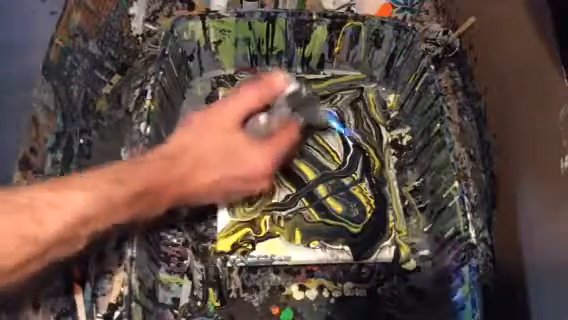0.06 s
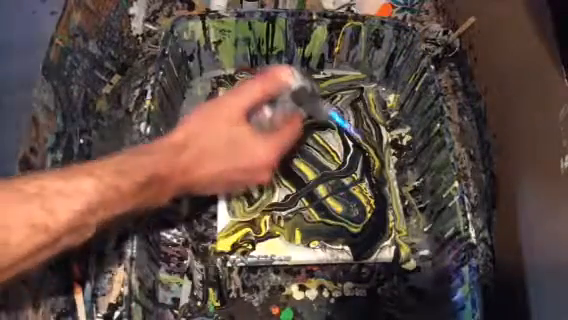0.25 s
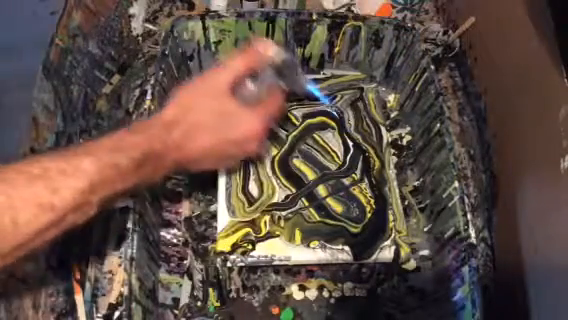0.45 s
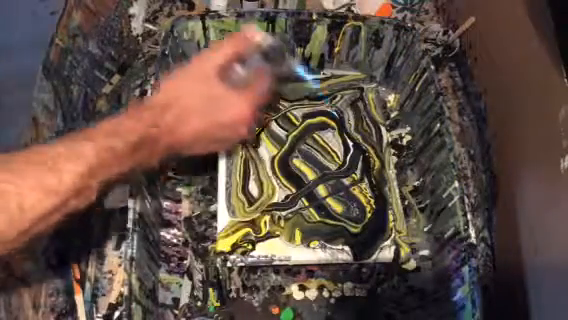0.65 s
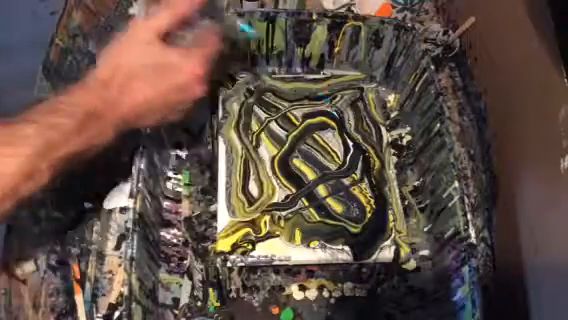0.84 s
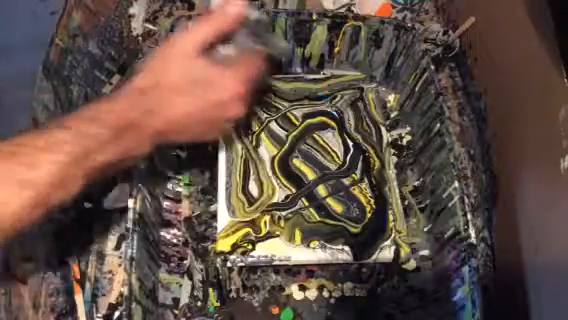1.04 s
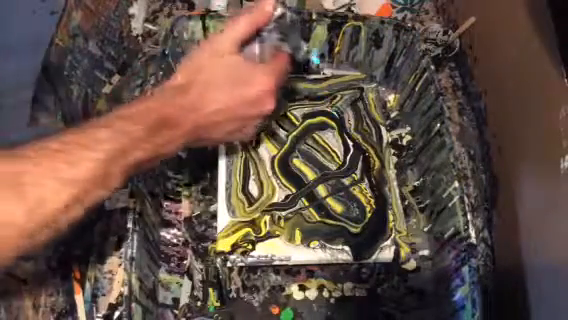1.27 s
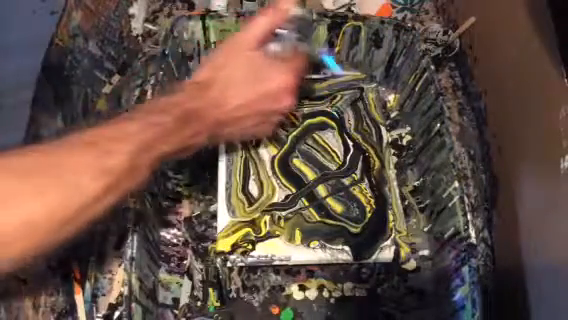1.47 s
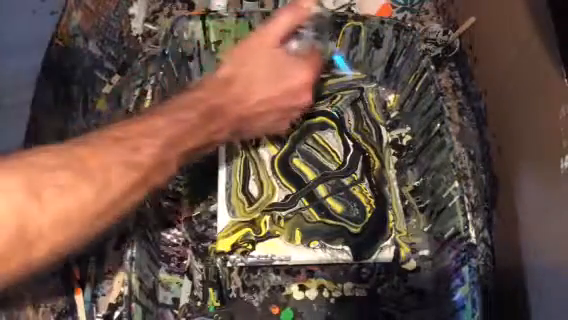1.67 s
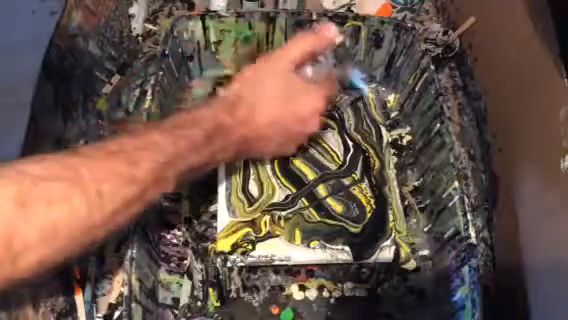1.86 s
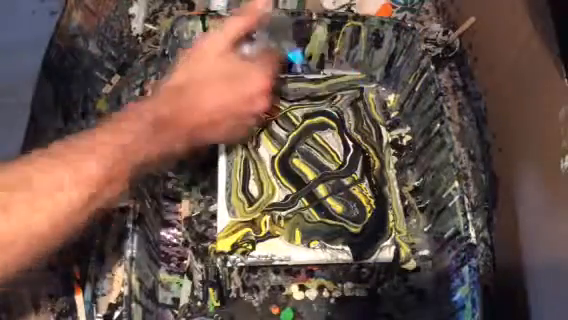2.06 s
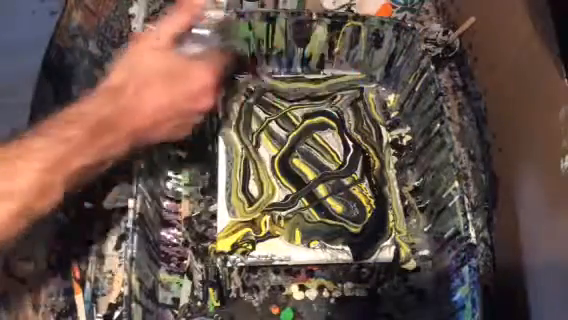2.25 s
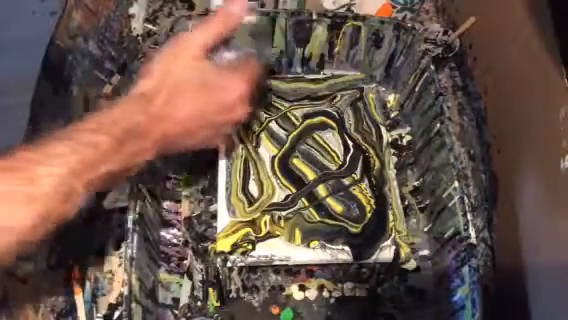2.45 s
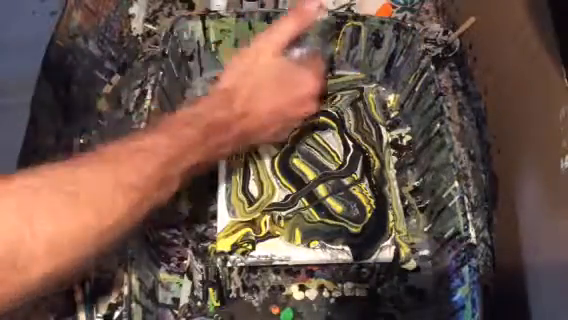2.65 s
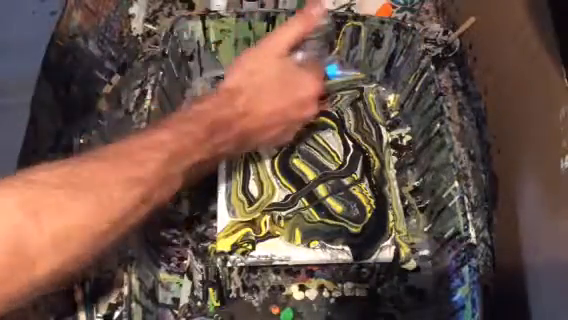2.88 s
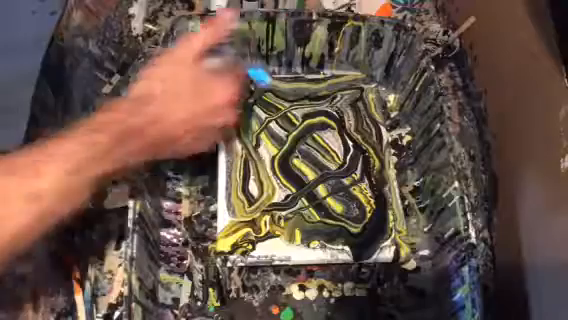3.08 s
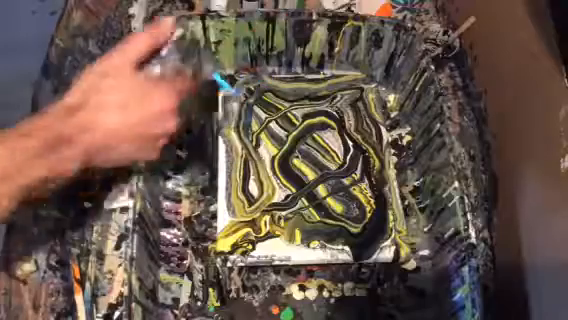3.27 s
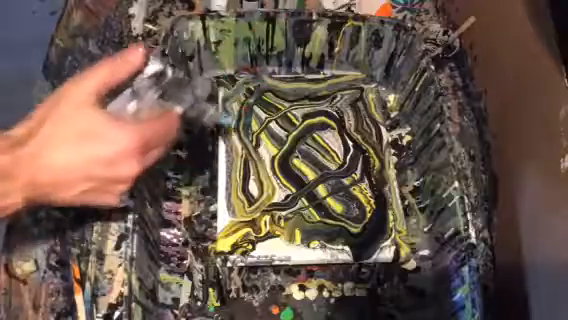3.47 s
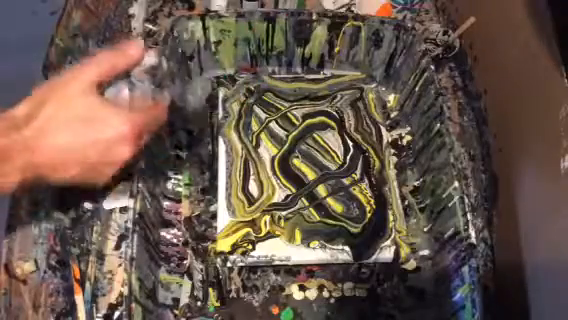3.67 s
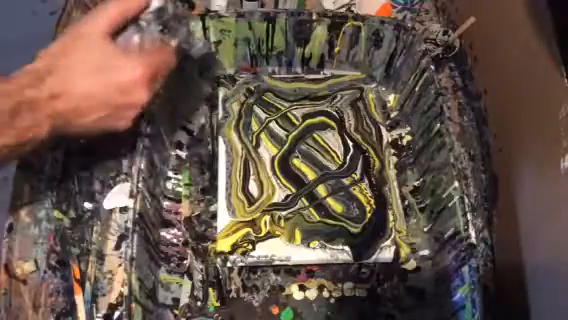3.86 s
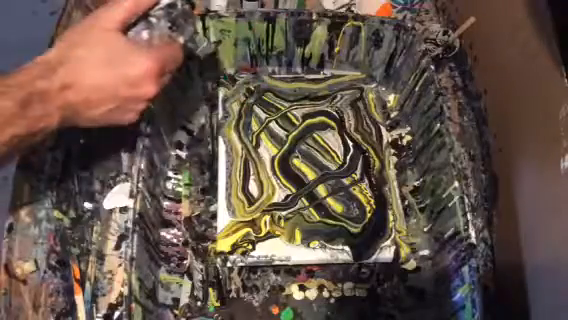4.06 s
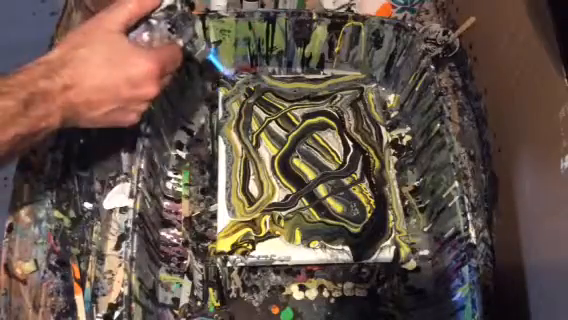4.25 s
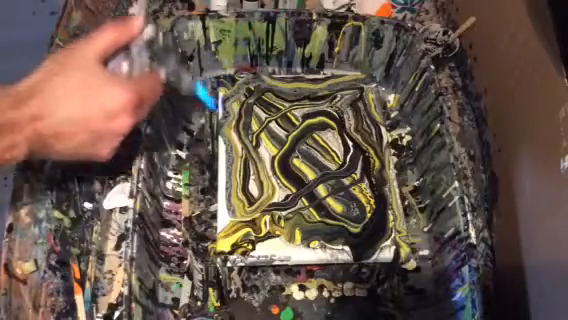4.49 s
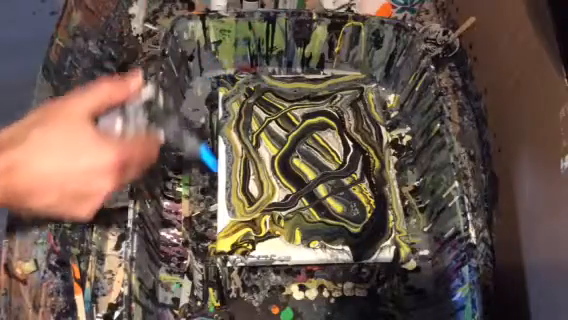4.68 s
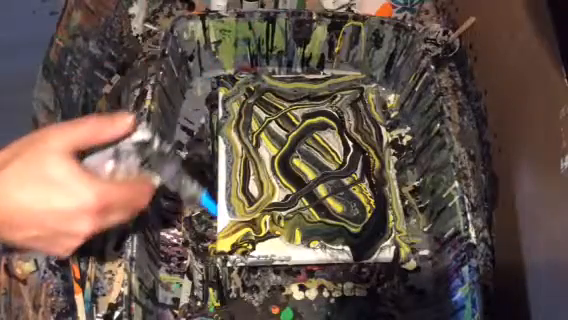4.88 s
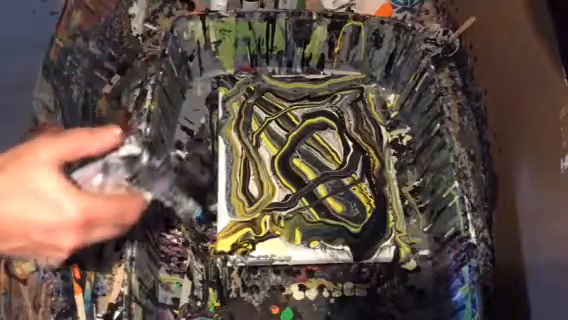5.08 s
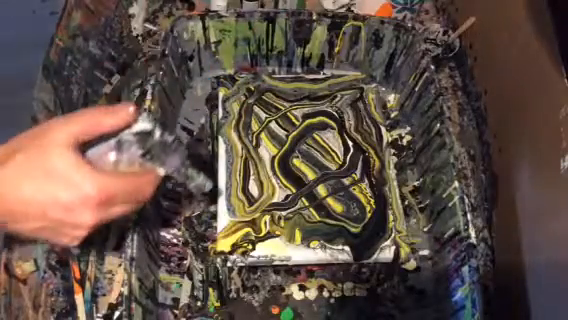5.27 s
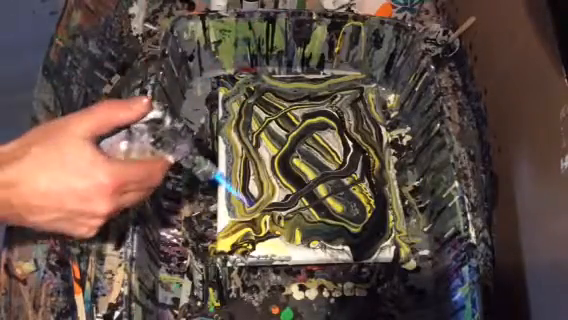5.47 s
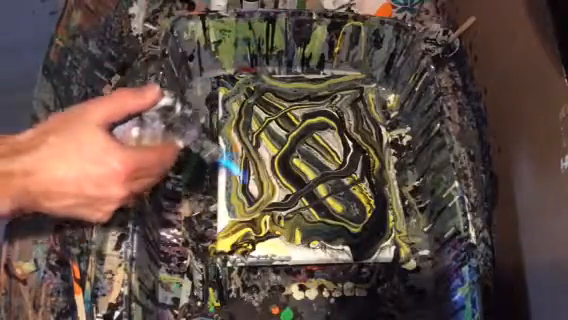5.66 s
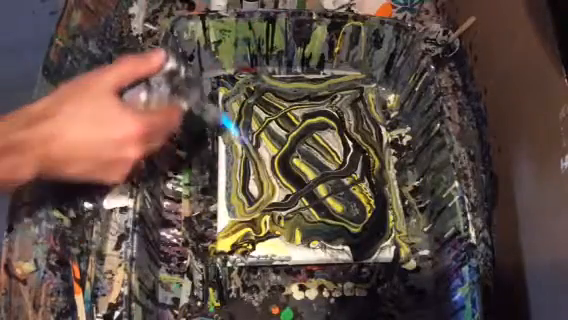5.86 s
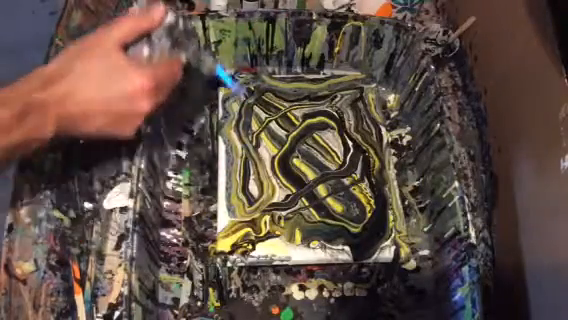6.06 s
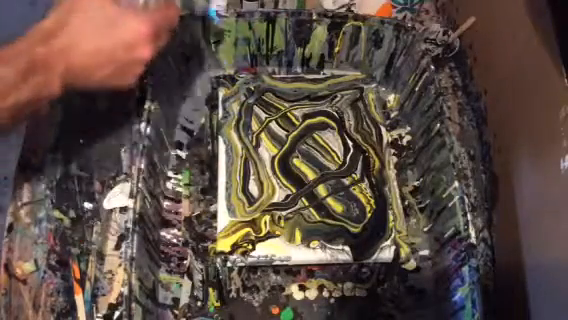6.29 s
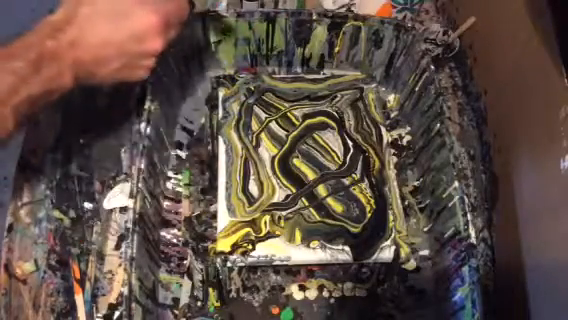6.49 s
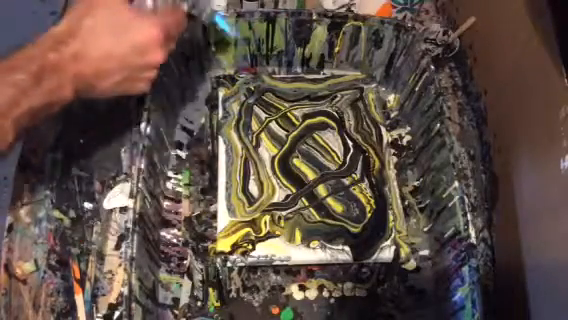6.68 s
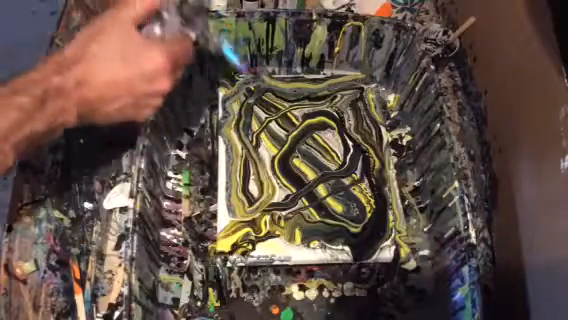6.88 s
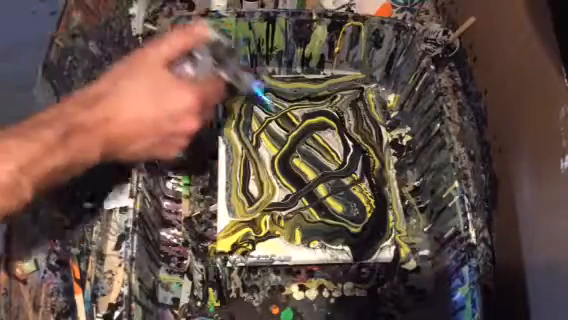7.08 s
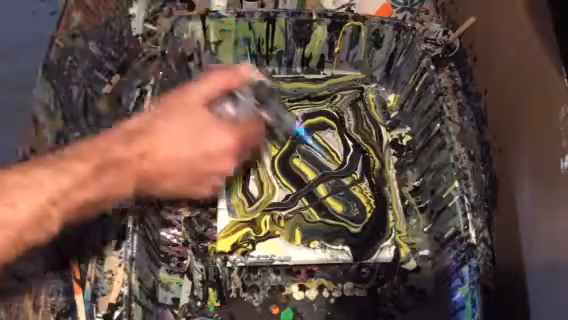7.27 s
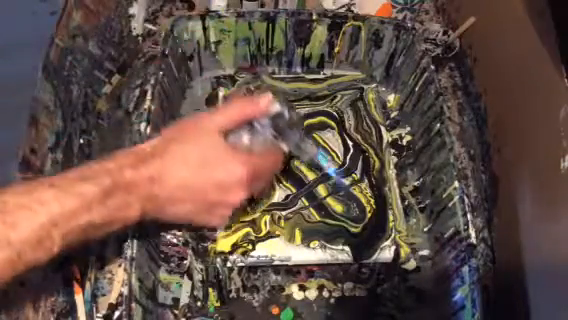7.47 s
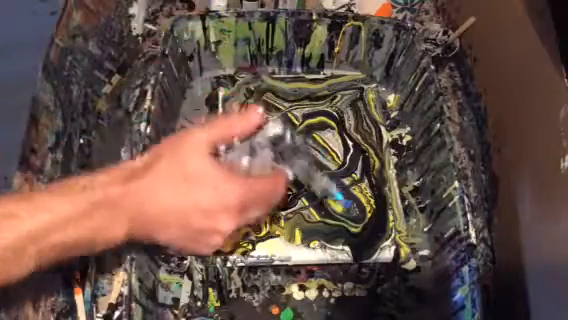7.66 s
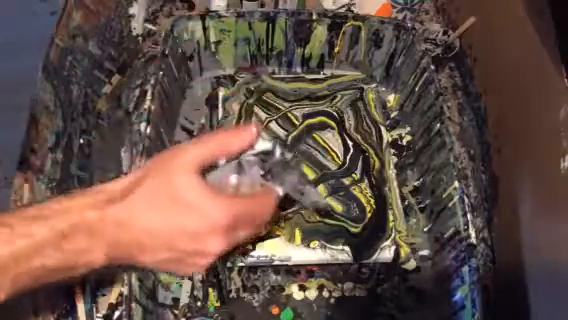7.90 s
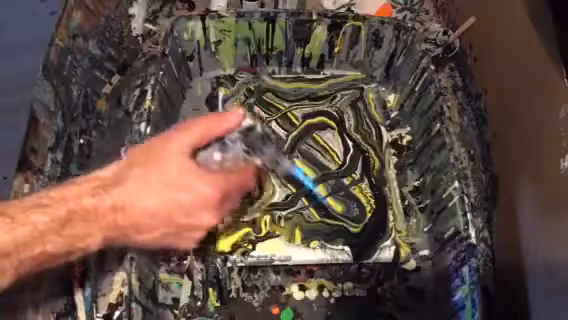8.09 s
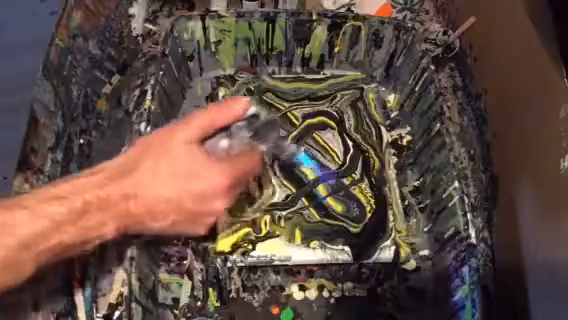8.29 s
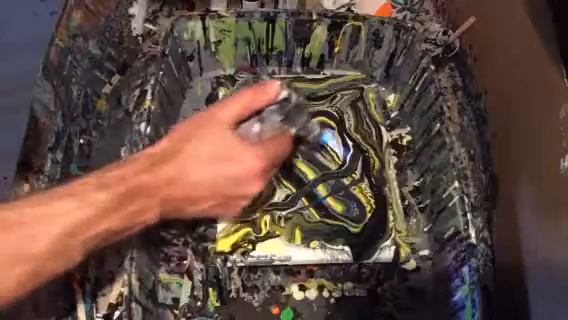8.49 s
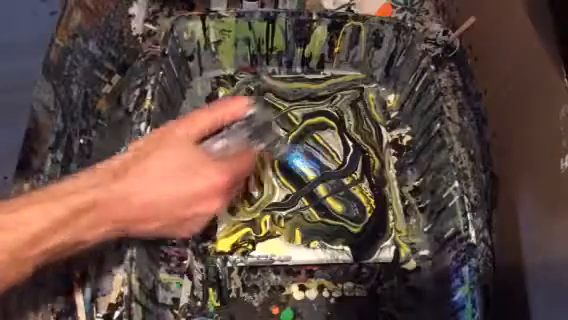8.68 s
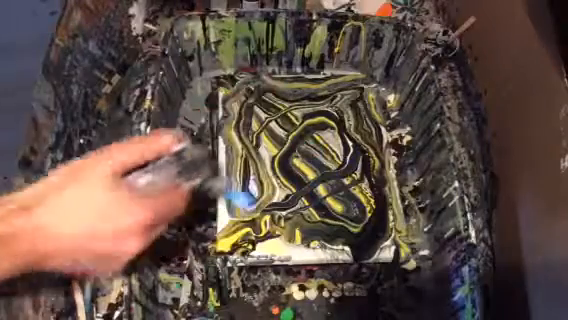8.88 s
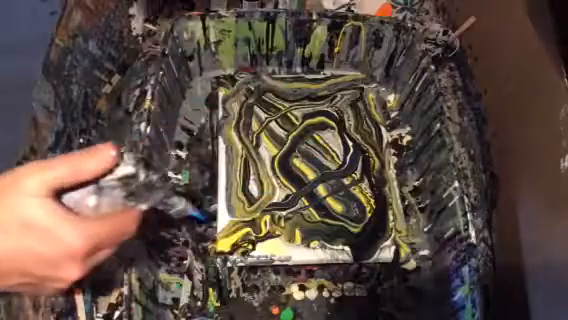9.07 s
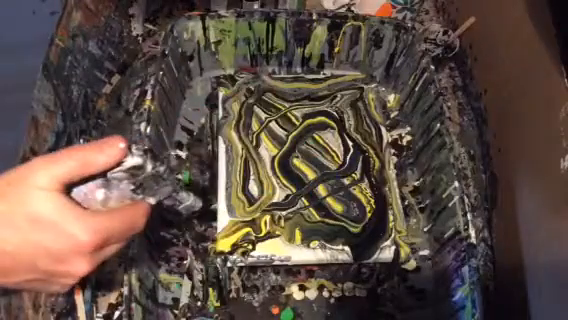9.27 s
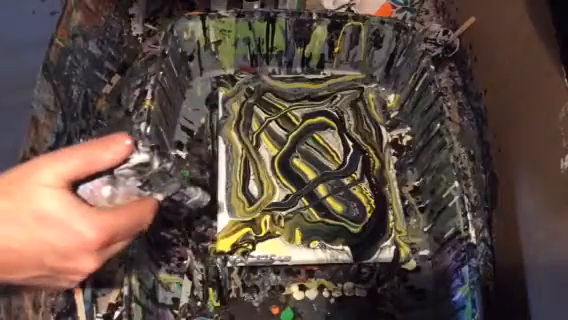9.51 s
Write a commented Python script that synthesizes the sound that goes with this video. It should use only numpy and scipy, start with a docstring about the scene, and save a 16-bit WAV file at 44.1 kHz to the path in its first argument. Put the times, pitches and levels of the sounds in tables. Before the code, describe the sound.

A steady, soft fan blows throughout, with low hum and a faint motor whine that comes and goes. A handheld gas torch is already burning at the start: a bright, airy hiss with a thin wavering whistle and a low fluttering flame, ending abruptly at 0.8 with small plastic-metal ticks until 1.1. At 1.3 a soft thumb knock and puff of gas come just before a loud, sharp, ringing igniter snap with a short bright room tail; the hiss runs to 2.1 and shuts off with a tick. Similar snaps come at 2.8, 4.3, 5.5, 6.8 and 8.15, their burns ending near 3.45, 4.9, 6.3, 7.7 and 9.05. The shut-off at 6.3 has an especially crisp click. The flame swells into soft gusts as the torch sweeps around, notably near 7.2 and 8.85. After final ticks at 9.05, only the fan remains. Mono, microphone close above the table.

```python
"""A craft room, a mono microphone above a table: a handheld butane torch is lit again and again over a steady fan.
The fan is shaped noise with wavering sines; a burn already under way is heard first. The jet is banded noise
with narrow whistling bands, the flame low noise. Noisy blows ring the modes of the torch body for each igniter
snap and trigger tick, and echoes and a diffuse tail answer from the room. Each valve opening is a decaying low
sine and two short swells of noise."""
import sys
import numpy as np
from scipy import signal
from scipy.fft import rfft, irfft, next_fast_len
from scipy.io import wavfile
from scipy.ndimage import uniform_filter1d

SR = 44100
rng = np.random.default_rng(int(sys.argv[2]) if len(sys.argv) > 2 else 0)


def bounce(signal):
    """Save signal as a 16-bit WAV file at the path given by the first command-line argument."""
    frames = np.transpose(np.atleast_2d(signal))
    limited = np.clip(frames, -1, 1)
    pcm = np.round(limited * 32767).astype(np.int16)
    wavfile.write(sys.argv[1], SR, pcm)


N = 420713
T = np.arange(N) / SR
FFT = next_fast_len(N)

# Fan air noise, relative colour: pitch_hz, level_db (per Hz)
FAN_COLOUR = [(22, -44), (45, -20), (70, -11.5), (140, -11), (200, -16), (320, -15.5), (400, -15.5),
              (600, -11.5), (800, -11.5), (1550, -13.5), (2300, -19), (2700, -22.5), (4800, -26.5),
              (15800, -44)]
# Fan hum lines: pitch_hz, wander_hz, level_db, waver_db
FAN_HUM = [(82, 1.54, -67.5, 3), (119.9, 0.52, -59.5, 1.65), (257, 3, -73, 1), (325, 3, -75.5, 2),
           (571, 3, -70.5, 2), (647, 6, -70.5, 2)]
# Fan motor whine coming and going: time_s, level_db
FAN_WHINE = [(0, -60.5), (.5, -55.5), (1.1, -64), (1.3, -59), (1.5, -64), (2.05, -59), (2.3, -64),
             (3.1, -59.5), (3.75, -70), (4.2, -64), (4.65, -60), (5.2, -64), (6.3, -64), (6.47, -58.5),
             (6.85, -66), (7.25, -60.5), (7.6, -68), (8.1, -71), (8.7, -63), (9.54, -65)]
FAN_DB, WHINE_HZ = -52.5, 731.5

# Burns: valve_shuts_s, gas_dies_db_per_s, flame_start_db, flame_end_db, whistle_db (levels before sway)
BURNS = [(.8245, 150, -61, -61, -76.5), (2.144, 135, -56, -62.5, -76), (3.451, 125, -61, -58.5, -75),
         (4.932, 130, -56.5, -62, -77), (6.284, 150, -56.5, -61, -77.5), (7.678, 132, -63, -62, -77),
         (9.047, 150, -63.5, -64, -77)]
# Hiss, one list a burn, before sway: time_s, lower_part_db, upper_part_db
HISS_LEVELS = [
    [(.05, -58.5, -59.5), (.3, -59.5, -57.5), (.48, -57.5, -57.5), (.6, -57, -58.5), (.8, -58.5, -58)],
    [(1.55, -59, -60), (1.68, -56.5, -58), (1.8, -57.5, -56.5), (1.92, -58.5, -58), (2.13, -56, -58)],
    [(3.0, -57.5, -59), (3.14, -61, -59), (3.22, -62, -56.5), (3.43, -57.5, -58.5)],
    [(4.5, -59.5, -59), (4.58, -58.5, -57.5), (4.7, -60.5, -58), (4.9, -60, -61)],
    [(5.75, -59.5, -60), (5.85, -59.5, -58), (6.15, -61.5, -59), (6.27, -56.5, -57)],
    [(7.0, -59, -59), (7.1, -60.5, -58), (7.27, -60, -56), (7.66, -62, -60)],
    [(8.36, -60, -57), (8.5, -59, -57.5), (8.74, -58, -58.5), (9.0, -58.5, -60)],
]
# Jet hiss, relative colour: pitch_hz, level_db (per Hz)
JET_COLOUR = [(1470, -42.5), (2500, -34), (3270, -10.5), (3790, -7.5), (4290, -13.5), (4850, -11.5),
              (5370, -12.5), (6920, -11.5), (8460, -0.5), (9720, -3.5), (10600, 2.5), (11900, -8),
              (14600, -3), (15800, -13)]
# Flame rumble, relative colour: pitch_hz, level_db (per Hz)
FLAME_COLOUR = [(80, -41), (125, 6.5), (165, 2.5), (260, -4.5), (500, -11.5), (1200, -16)]
# The flame flares up as it licks the surface: centre_s, half_length_s, rise_db
FLARES = [(.29, .04, 6), (1.77, .06, 7), (1.98, .04, 7), (2.15, .03, 8), (3.02, .1, 5), (4.42, .06, 2),
          (4.69, 0.041, 8), (6.02, .03, 6), (7.15, .1, 7.5), (7.4, 0.12, 7.5), (8.85, 0.25, 8)]
# Pitch of the nozzle whistle before its drift: time_s, pitch_hz
NOZZLE_PITCH = [(0.1, 4860), (.28, 5090), (.5, 4880), (.58, 5020), (.7, 4960), (.85, 5120), (1.5, 4680),
                (2.1, 4740), (3.05, 4680), (3.35, 4930), (4.5, 4680), (4.8, 5040), (5.8, 4850), (6.2, 4950),
                (7.12, 5050), (7.26, 4760), (7.4, 4820), (7.47, 4920), (7.6, 5000), (8.3, 4720),
                (8.41, 4850), (8.45, 5120), (8.52, 5000), (8.6, 5080), (8.8, 4600), (8.94, 4620),
                (9.0, 4920)]
# The nozzle whistle stands out for a moment: centre_s, half_length_s, rise_db
NOZZLE_SWELLS = [(.15, .06, 4), (.26, .04, 5), (.555, .045, 12), (.70, .03, 11), (.77, .02, 7),
                 (.85, .03, 6), (2.0, .1, 6), (3.3, .06, 6), (4.8, .08, 6), (6.15, .08, 4), (7.18, .07, 7),
                 (7.44, .06, 10), (7.58, .05, 6), (8.36, .05, 7), (8.455, .02, 14), (8.55, .06, 11),
                 (8.93, .02, 8), (9.0, .02, 10)]
# Time that lower hiss, upper hiss, flame and whistle outlast the valve, one row each: drain_s
DRAIN_S = [
    [0.02],
    [0.0053],
    [.015],
    [.02],
]
# The same four swell and dip as the hand sweeps the torch: typical dB, new levels per second
SWAY_DB, SWAY_PER_S = [.8, .8, 1.8, 1.0], [11., 9., 11., 5.]
OPEN_S = .035  # the gas builds over this time
SPLIT_HZ = 9700  # the hiss parts trade strength about this pitch as the torch turns

# Trigger parts tick as the thumb moves: start_s, level_db, rattle_s, loudest_hz, fall_db_per_octave
TICKS = [(.6424, -54, .0025, 8460, 12), (.8245, -46.5, 0.0052, 2920, 25), (.9316, -49, .002, 3900, 12),
         (1.14, -52, .002, 2700, 10), (2.143, -42, 0.0022, 3000, 17), (2.164, -48, .002, 3000, 11),
         (2.252, -48, 0.0034, 4970, 11), (2.712, -69, 0.0022, 3800, 5), (3.451, -40, 0.0036, 3060, 21),
         (3.4535, -45, .003, 6300, 12), (4.931, -42.5, 0.0016, 2960, 25), (6.2831, -45, 0.0068, 2700, 21),
         (6.2844, -27, 0.00058, 8400, 10), (6.417, -54, .002, 3000, 11), (7.678, -47.5, 0.0041, 3190, 23),
         (9.048, -47.5, 0.003, 2600, 7), (9.085, -50.5, 0.0036, 3600, 7)]
# Shared by all ticks: grip_db (one per gripped mode), first_force, loose_parts_db, loose_fade_s, ring_swings
TICK_CONTACT = ((5, -3, 0, 0, 0, 0, -5, 3, -2), 1.6, -9, 0.006, 11)
# Igniter hammer: start_s, level_db, rattle_s, loudest_hz, fall_db_per_octave, grip_db (one per gripped mode)
SNAPS = [(1.3270, -16, 0.0034, 5500, 1.2, (1.5, 2, 1, -1, 5, 1.5, 0.5, 0, -1)),
         (2.7915, -16.5, 0.0039, 5530, 2.5, (1, -0.5, 4, 4, -1.5, 2, 0, 0, -2)),
         (4.2910, -15.5, 0.0025, 4750, 4, (-2, -3.5, 4, -4, -6, -2, 0.5, 0, -2.5)),
         (5.5257, -16.5, 0.0032, 5680, 4.1, (-8, 6, -3, 6, -1, -0.5, 0, -1, -2)),
         (6.7952, -16.5, 0.0031, 5530, 3, (-1, -4, 0.5, 3.5, 3, 0.5, 0, 6, 3)),
         (8.1535, -19, 0.0061, 5000, 4.8, (0, 5, -2, 2.5, -2, -1, 0, 0, 1))]
# Ringing modes of the torch body, relative strength: pitch_hz, level_db
BODY_MODES = [(1550, -13), (2290, -6.5), (2980, -6), (3550, -5.5), (4600, 1), (5450, -6), (6340, -0.5),
              (7100, -19), (7950, 1.5), (8900, -1.5), (9700, -3.5), (10600, -5.5), (11600, -5.5),
              (12900, -9), (14400, -12), (15600, -28)]
# Modes that the grip lets ring more or less: row in BODY_MODES
GRIPPED_MODES = [0, 1, 2, 3, 5, 8, 4, 7, 9]
FIRST_BLOW = 2.1  # force of the hammer's first contact, against a typical rattle blow of 1
# The hand damps the body. Swings until 60 dB down, towards the microphone and the walls
RING_CYCLES, WALL_CYCLES = 26, 15
LOW_RING = .25  # modes below the fifth ring more swings, by this power of the pitch ratio
SWELL_CYCLES = 2.0  # time constant of a mode's swell, in swings

# Echoes off the table: delay_s, level_db
TABLE_ECHOES = [(.0045, -26), (.008, -19), (.013, -28)]
# Echoes off flat walls: delay_s, level_db
WALL_ECHOES = [(.043, -30), (.058, -35), (.062, -27.5), (.068, -34)]
# Diffuse tail of the room, relative bands: pitch_hz, time_to_fall_60_db_s, level_db
TAIL_BANDS = [(1780, 0.85, -3.5), (2780, 0.67, -5.5), (4650, 0.57, -1), (7450, 0.41, 2), (11600, 0.37, 7)]
TAIL_DB, TAIL_RISE_S = -15, 0.055

# Valve opens: start_s, thumb_knock_db, puff_peak_db, flutter_peak_db
VALVE_OPENINGS = [(1.293, -43, -50, -49), (2.766, -43, -48.5, -50.5), (4.244, -42, -50.5, -51),
                  (5.479, -43.5, -57, -62), (6.741, -50, -57, -62), (8.098, -46, -58, -70)]
# Puff of first gas, relative colour: pitch_hz, level_db (per Hz)
PUFF_COLOUR = [(1500, -22), (3000, 9), (6000, 2), (8500, 9), (12000, -1), (15800, -4)]
# Gas filling the burner tube, relative colour: pitch_hz, level_db (per Hz)
FLUTTER_COLOUR = [(250, -24), (500, -6.5), (900, -5), (1500, -16)]
# Seconds from opening to the loudest moment; the knock comes ahead by its lead
PUFF_S, FLUTTER_S, KNOCK_LEAD_S = .011, .012, .006

ROLL_HZ, TOP_HZ = 15750, 16800  # corners of the recorder's two lowpass filters


def undb(db):
    """Amplitude ratio of a level in dB."""
    return 10 ** (np.asarray(db) / 20)


def unit(x):
    """Scale to rms 1."""
    return x / np.sqrt(np.mean(x ** 2))


def walk(rate):
    """Random levels held 1 / rate s and slewed twice; spread near 1."""
    hold = int(SR / rate)
    steps = np.repeat(rng.standard_normal(N // hold + 1), hold)
    slewed = uniform_filter1d(uniform_filter1d(steps, hold), hold)
    return 1.288 * slewed[:N]


def noise(colour, flicker_db=0., rate=8., size=N, count=1):
    """Noise of a (Hz, dB) colour; with flicker, count bands an octave waver separately; rms 1."""
    fast = next_fast_len(size)
    octave = np.log2(np.maximum(np.fft.rfftfreq(fast, 1 / SR), 1))
    hz, db = np.transpose(colour)
    shape = undb(np.interp(octave, np.log2(hz), db, -90, -90))
    spectrum = rfft(rng.standard_normal(fast)) * shape
    if not flicker_db:
        return unit(irfft(spectrum, fast)[:size])
    total = 0
    for band in range(int(count * np.log2(hz[0])), int(count * np.log2(hz[-1])) + 2):
        overlap = np.clip(1 - abs(count * octave - band), 0, 1)
        part = irfft(spectrum * overlap, fast)[:size]
        total = total + part * undb(flicker_db * walk(rate))
    return unit(total)


def add(out, s, sound):
    """Lay a sound into out from s seconds."""
    i = int(s * SR)
    out[i:i + len(sound)] += sound[:N - i]


def level_at(table):
    """Second column of a table, interpolated over its times."""
    return np.interp(T, *np.transpose(table))


def swells(table):
    """Bell-shaped rises in level, dB."""
    return sum(db * np.exp(-((T - s) / half) ** 2) for s, half, db in table)


def tone(hz, wander, db):
    """A sine whose pitch wanders."""
    phase = 2 * np.pi * np.cumsum(hz + wander * walk(20.)) / SR
    return np.sqrt(2) * undb(db) * np.sin(phase)


def fan():
    """Steady air noise, a few wavering hum lines and a whine that comes and goes."""
    out = undb(FAN_DB) * noise(FAN_COLOUR)
    for hz, wander, db, waver_db in FAN_HUM:
        out += tone(hz, wander, db + waver_db * walk(13.0))
    return out + tone(WHINE_HZ, 4.1, level_at(FAN_WHINE) + 1.7 * walk(12.))


def whistle(hz, width, wander):
    """A narrow band of noise whose centre drifts; rms near 1."""
    swing = noise([(1, 0), (width / 2, 0), (2 * width, -24)])
    phase = 2 * np.pi * np.cumsum(hz + wander * walk(4.)) / SR
    return np.sqrt(2) * swing * np.sin(phase)


def burn_gains():
    """Gas flow sets the gain of lower hiss, upper hiss, flame and whistle: it builds, holds and drains."""
    gains = np.zeros((4, N))
    starts = [-.5] + [opening[0] for opening in VALVE_OPENINGS]  # the first burn is already under way
    for opens, burn, hiss in zip(starts, BURNS, HISS_LEVELS):
        shuts, dies_db_s, flame0_db, flame1_db, whistle_db = burn
        s, low_db, high_db = np.transpose(hiss)
        held_db = np.array([np.interp(T, s, low_db),
                            np.interp(T, s, high_db),
                            np.interp(T, (opens, shuts), (flame0_db, flame1_db)),
                            np.full(N, whistle_db)])
        lost_db = dies_db_s * np.maximum(T - shuts - DRAIN_S, 0)
        gains += np.clip((T - opens) / OPEN_S, 0, 1) * undb(held_db - lost_db)
    return gains * undb([db * walk(rate) for db, rate in zip(SWAY_DB, SWAY_PER_S)])


def gas():
    """The jet hisses and whistles through the nozzle and the flame rumbles unevenly while the valve is open."""
    gains = burn_gains()
    flickering = noise(JET_COLOUR, flicker_db=1.5, rate=25., count=5)
    jet = rfft(undb(0.61 * walk(25.)) * flickering, FFT)
    is_low = np.fft.rfftfreq(FFT, 1 / SR) < SPLIT_HZ
    low = unit(irfft(jet * is_low, FFT)[:N])
    low += undb(-9.0 + 1.8 * walk(12.)) * whistle(8500., 400., 220.)
    high = unit(irfft(jet * ~is_low, FFT)[:N])
    high += undb(-10.0 + 1.8 * walk(12.)) * whistle(10600., 350., 220.)
    rumble = undb(2.2 * walk(14.) + swells(FLARES)) * noise(FLAME_COLOUR)
    patchy = undb(2.0 * walk(30.) + swells(NOZZLE_SWELLS)) * whistle(level_at(NOZZLE_PITCH), 140., 35.)
    return np.sum(gains * [low, high, rumble, patchy], axis=0)


def strike(rattle_s, centre_hz, fall_db, grip_db, first=FIRST_BLOW, after_db=-4.0, dies_s=0.0065,
           swings=RING_CYCLES):
    """A rattle of uneven blows, then weaker loose parts that settle, ring each mode of the torch body.
    The first sound goes to the microphone; the second, the mean colour over all directions, to the walls."""
    t = np.arange(int(.08 * SR)) / SR
    hz, db = np.transpose(BODY_MODES)[:, :, None]
    loose = undb(after_db) * np.exp(-(t - rattle_s) / dies_s)
    force = np.where(t < rattle_s, 1, loose)
    uneven_db = 3.0 * np.repeat(rng.standard_normal(len(t) // 20 + 1), 20)[:len(t)]
    force *= undb(uneven_db)
    force[:20] = first
    blows = rng.standard_normal((len(BODY_MODES), len(t))) * force

    # each mode swells for a few swings before it fades, which keeps the valleys dark
    swing = np.sin(2 * np.pi * hz * t) * -np.expm1(-hz * t / SWELL_CYCLES)
    near_cycles = swings * np.maximum(hz[4] / hz, 1) ** LOW_RING
    near = swing * np.exp(-np.log(1000) * t * hz / near_cycles)
    wide = swing * np.exp(-np.log(1000) * t * hz / WALL_CYCLES)
    rings = np.array([signal.fftconvolve(near, blows, axes=1)[:, :len(t)], wide])

    gain = undb(db - fall_db * abs(np.log2(hz / centre_hz))) * np.ones((2, 1, 1))
    gain[0, GRIPPED_MODES, 0] *= undb(grip_db)
    # equalise the energy of the modes, so that gain alone sets the colour
    energy = np.sum(rings ** 2, axis=2, keepdims=True)
    rings *= gain * np.sqrt(rattle_s * SR / np.sum(gain[1] ** 2) / energy)

    # over all directions the modes add in power, with no cancelling between them
    power = np.sum(abs(rfft(rings[1])) ** 2, axis=0)
    mean = irfft(np.sqrt(power), len(t))
    return rings[0].sum(axis=0), np.roll(mean, 80)[:400]


def trigger():
    """Loud igniter snaps and soft ticks ring the torch body, towards the microphone and the walls."""
    near, walls = np.zeros((2, N))
    for s, db, *contact in SNAPS + [tick + TICK_CONTACT for tick in TICKS]:
        direct, mean = strike(*contact)
        add(near, s, undb(db) * direct)
        add(walls, s, undb(db) * mean)
    return near, walls


def room(near, walls):
    """Direct sound, a few hard echoes and a lumpy diffuse tail that builds as the far walls answer."""
    t = np.arange(int(.6 * SR)) / SR
    tail = 0
    for hz, t60, db in TAIL_BANDS:
        band = noise([(hz / 2.4, -30), (hz / 1.25, 0), (hz * 1.25, 0), (hz * 1.9, -30)], size=len(t))
        lumps = undb(db + 2.0 * walk(116.0)[:len(t)])
        tail = tail + lumps * band * np.exp(-np.log(1000) * t / t60)
    tail *= np.clip(t / TAIL_RISE_S, 0, 1) ** 0.39
    response = undb(TAIL_DB) * tail / np.sqrt(np.sum(tail ** 2))
    out = near + signal.fftconvolve(walls, response)[:N]
    for s, db in TABLE_ECHOES:
        add(out, s, undb(db) * near)
    for s, db in WALL_ECHOES:
        add(out, s, undb(db) * walls)
    return out


def valve():
    """The thumb knocks the trigger home, then the first gas leaves in a puff and flutters in the tube."""
    out = np.zeros(N)
    t = np.arange(int(.1 * SR)) / SR
    knock = np.sin(2 * np.pi * 155.0 * t) * np.exp(-t / 0.0081)
    puff_shape = t / PUFF_S * np.exp(1 - t / PUFF_S)
    flutter_shape = t / FLUTTER_S * np.exp(1 - t / FLUTTER_S)
    for s, knock_db, puff_db, flutter_db in VALVE_OPENINGS:
        add(out, s - KNOCK_LEAD_S, undb(knock_db) * knock)
        add(out, s, undb(puff_db) * noise(PUFF_COLOUR, size=len(t)) * puff_shape)
        add(out, s, undb(flutter_db) * noise(FLUTTER_COLOUR, size=len(t)) * flutter_shape)
    return out


def scene():
    """Fan, burning gas, trigger in its room and valve, alike on both channels."""
    mono = fan() + gas() + room(*trigger()) + valve()
    return np.array([mono, mono])


def record(dry):
    """The recorder drops the highest treble, then cuts the top."""
    dull = signal.sosfilt(signal.ellip(5, .2, 20, ROLL_HZ, fs=SR, output="sos"), dry)
    return signal.sosfilt(signal.ellip(10, .2, 70, TOP_HZ, fs=SR, output="sos"), dull)


dry = scene()
out = record(dry)
bounce(out)
```